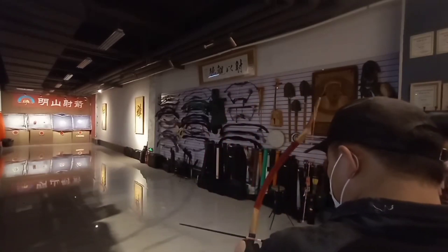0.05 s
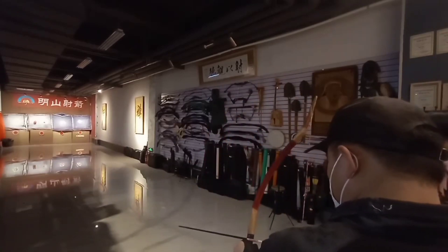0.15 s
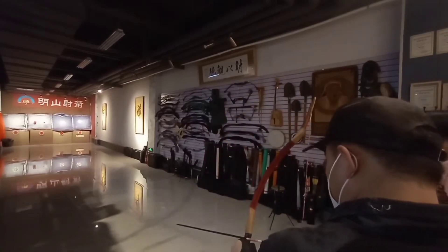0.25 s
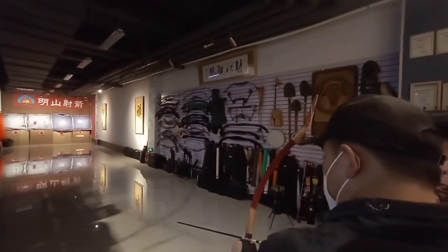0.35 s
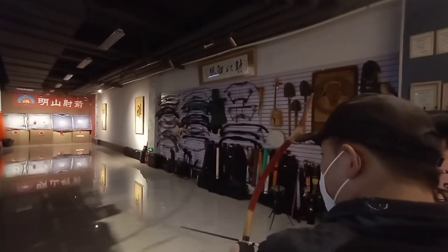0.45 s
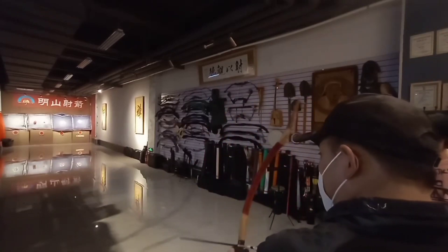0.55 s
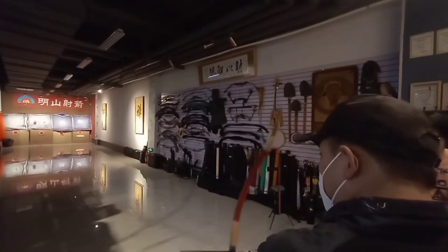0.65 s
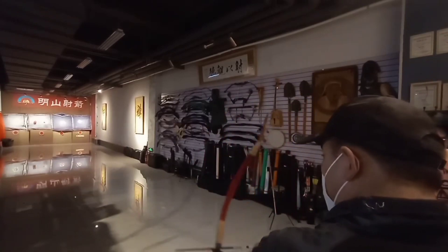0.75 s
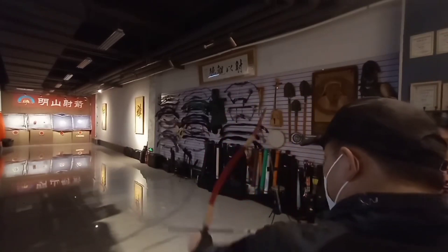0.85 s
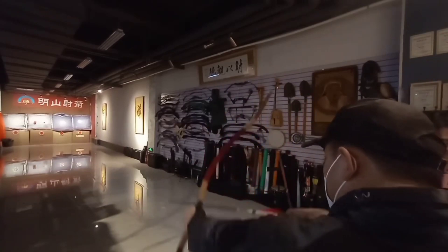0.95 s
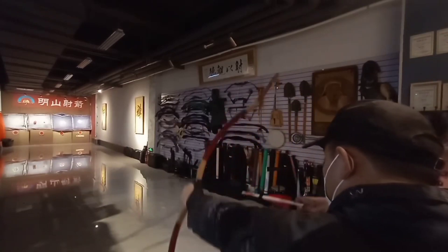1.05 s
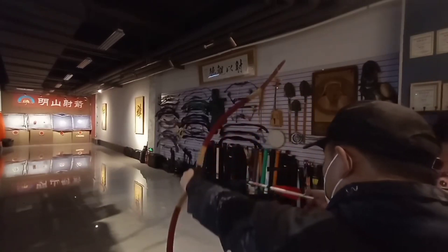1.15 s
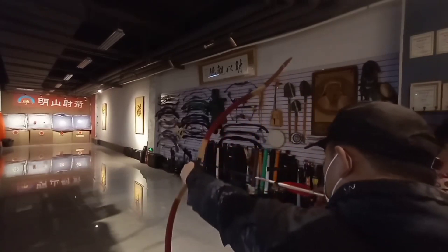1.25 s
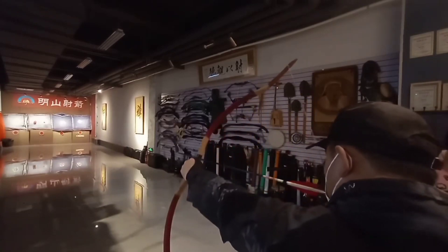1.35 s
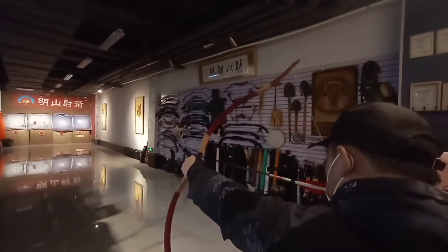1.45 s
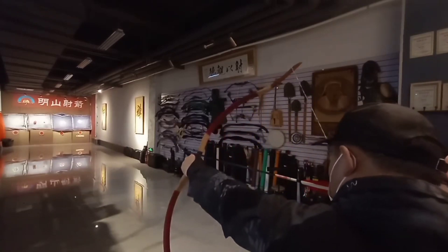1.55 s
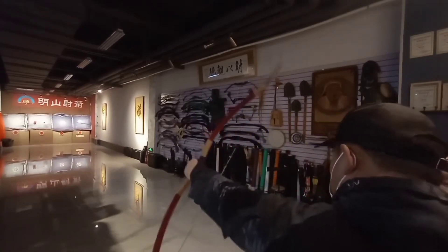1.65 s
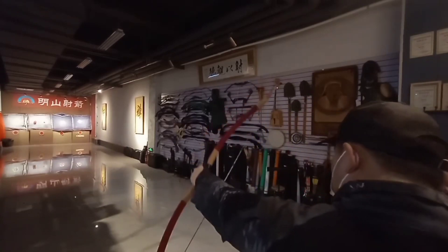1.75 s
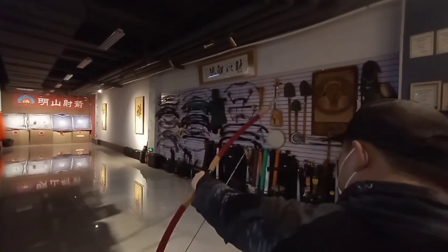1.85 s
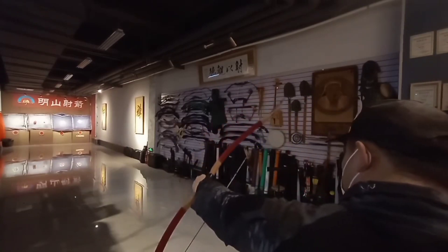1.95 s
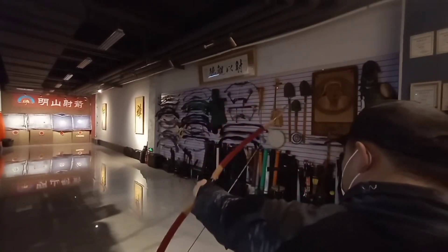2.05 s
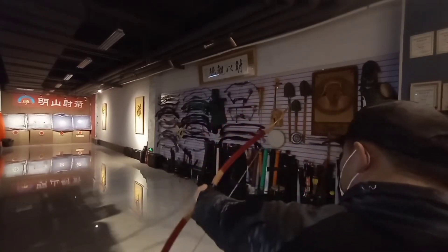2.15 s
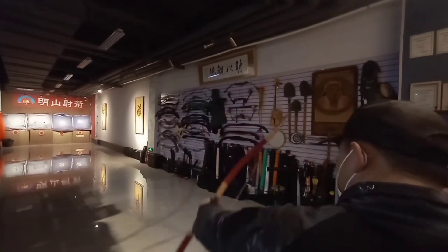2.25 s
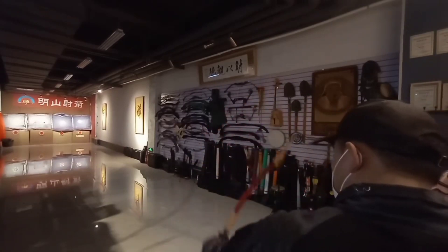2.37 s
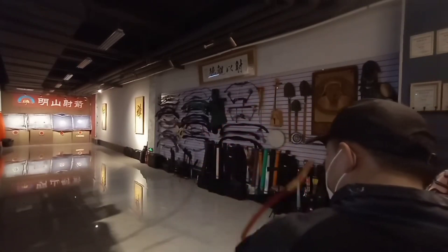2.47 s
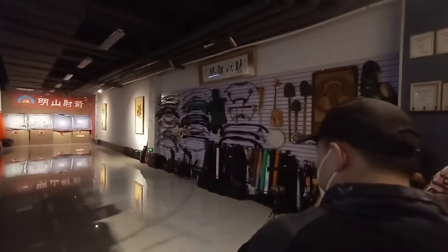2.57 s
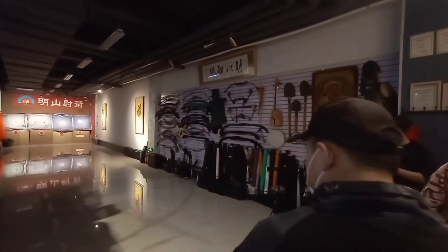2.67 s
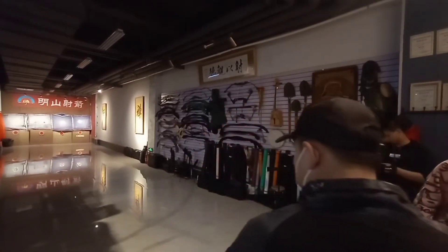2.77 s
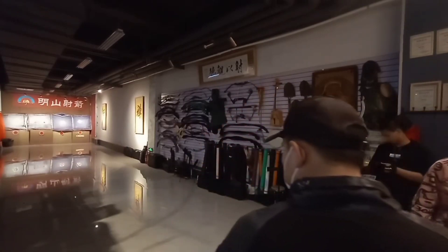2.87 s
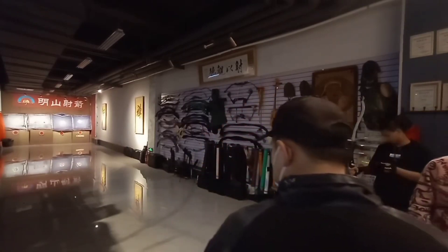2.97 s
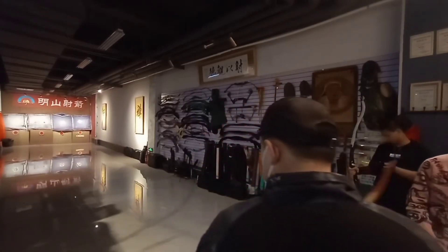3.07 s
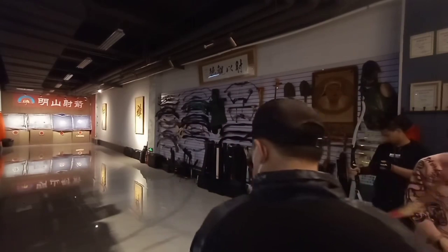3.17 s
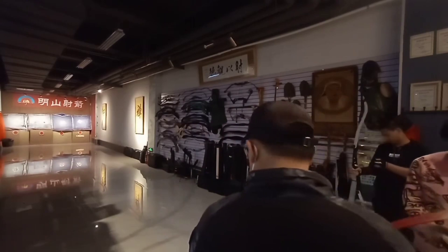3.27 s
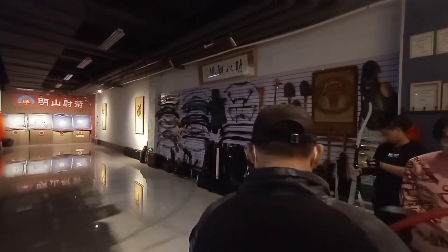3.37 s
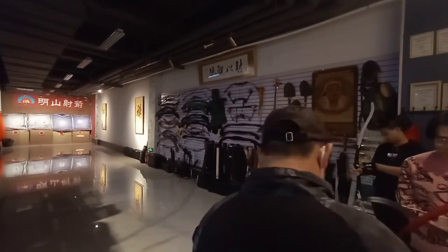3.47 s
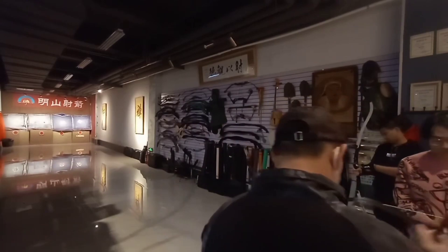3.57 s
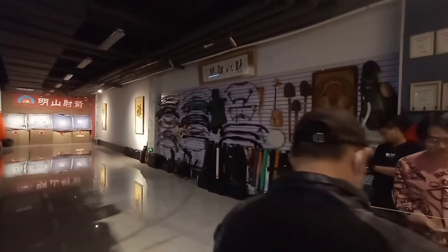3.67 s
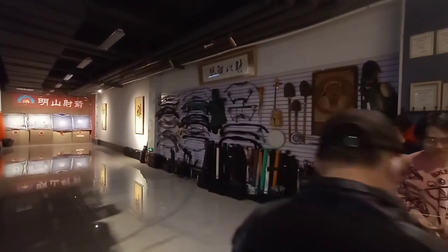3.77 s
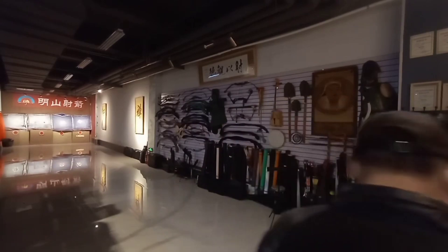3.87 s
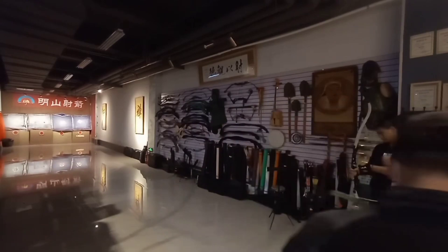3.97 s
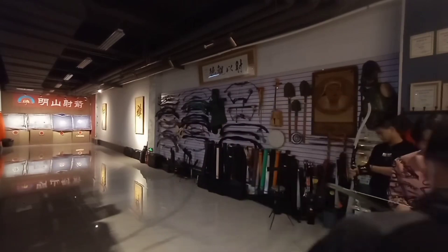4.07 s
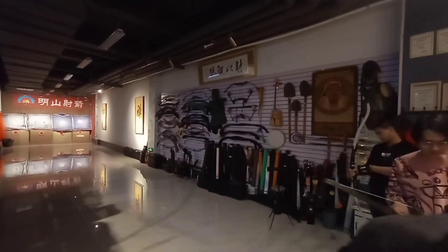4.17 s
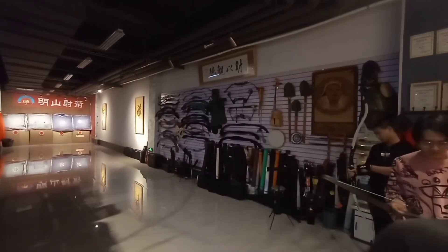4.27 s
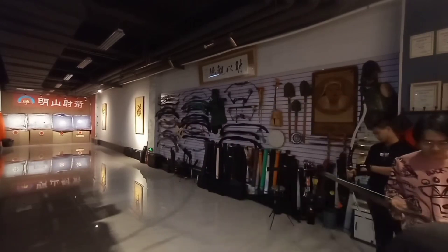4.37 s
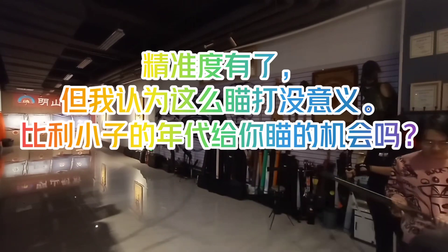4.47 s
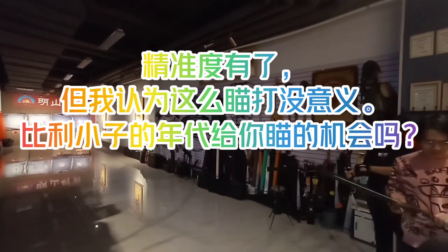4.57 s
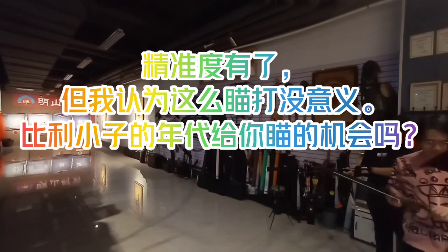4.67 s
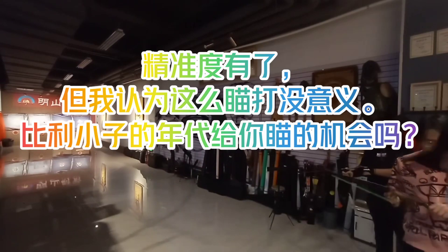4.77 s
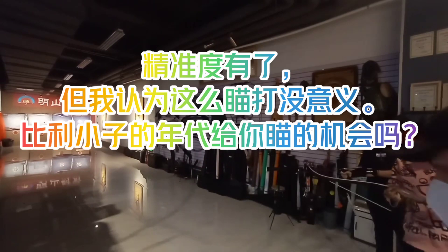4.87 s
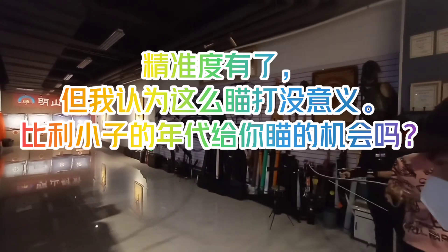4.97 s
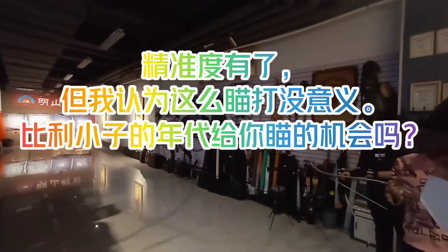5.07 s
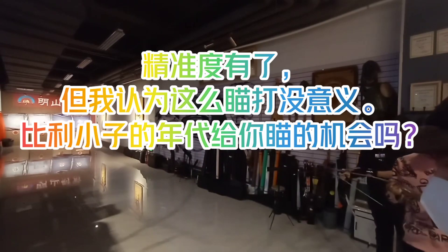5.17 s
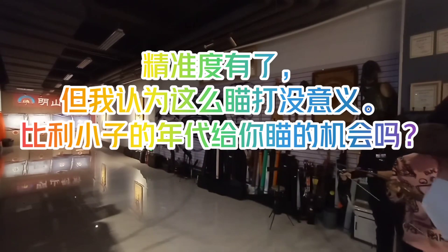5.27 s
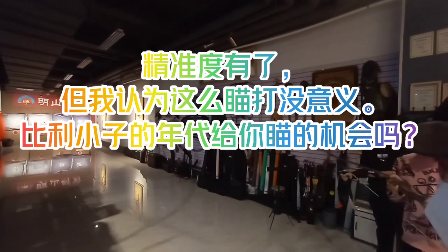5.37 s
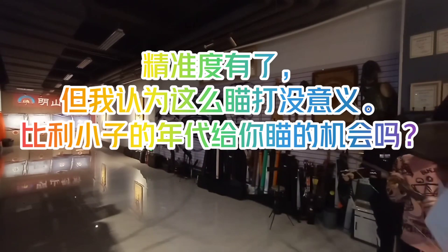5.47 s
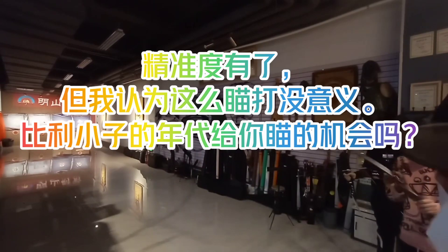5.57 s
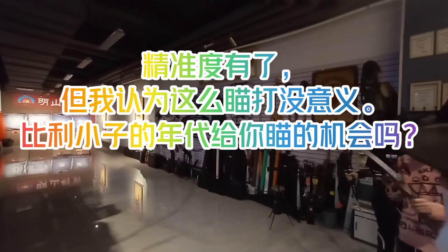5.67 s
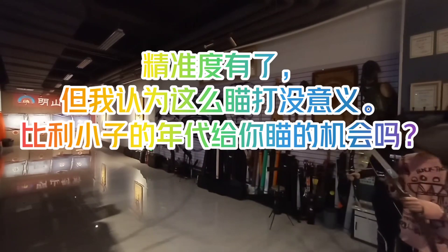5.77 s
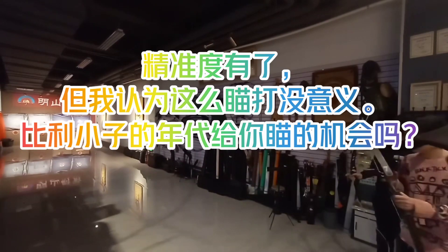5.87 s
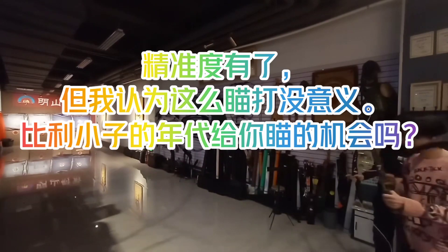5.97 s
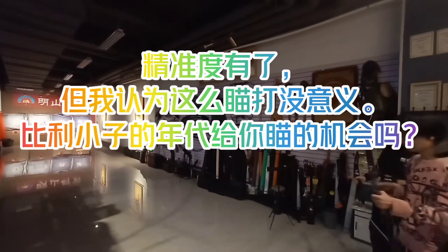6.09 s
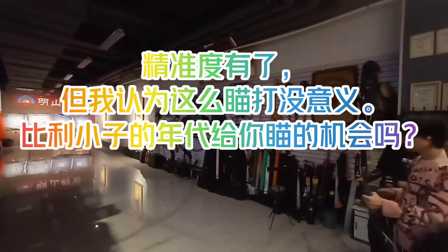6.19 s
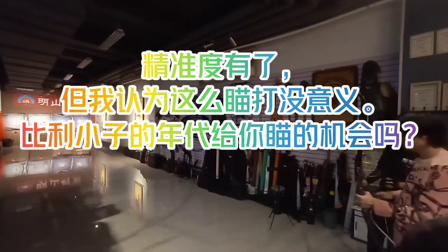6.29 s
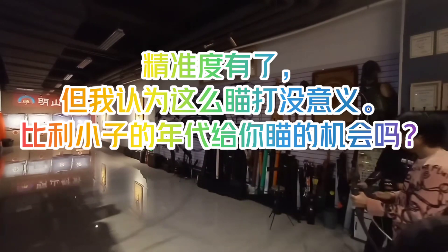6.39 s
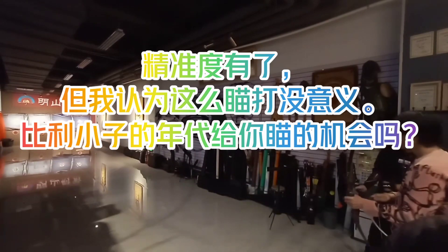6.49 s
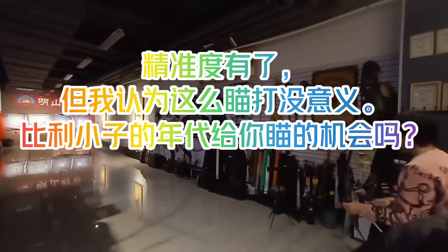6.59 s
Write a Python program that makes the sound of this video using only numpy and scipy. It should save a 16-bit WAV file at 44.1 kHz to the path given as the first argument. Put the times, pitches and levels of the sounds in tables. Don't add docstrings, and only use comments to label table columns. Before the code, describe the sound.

In a long hard-floored hall a bow snaps, its arrow booms into a distant bale, then shafts clack, fall and scrape close by.

```python
import sys
import numpy as np
from scipy import signal
from scipy.fft import rfft, irfft, next_fast_len
from scipy.io import wavfile
from scipy.ndimage import uniform_filter1d

SR = 44100
rng = np.random.default_rng(int(sys.argv[2]) if len(sys.argv) > 2 else 0)


def transcribe(u):
    v = np.clip(np.atleast_2d(u).T, -1, 1)
    q = np.round(v * 32767).astype(np.int16)
    wavfile.write(sys.argv[1], SR, q)


def natural_amplitude(level_db):
    exponent = np.asarray(level_db, float) / 20
    return 10 ** exponent


N = 292383

# [Hz, dB per Hz]
DROP_TONE = [(35, -53), (60, -28.5), (364, -7.5), (420, -4.5), (604, -9), (668, -10), (943, -2),
             (1600, -11), (3590, -14), (7600, -23), (9880, -55), (16700, -120)]
# [Hz, dB per Hz]
RUB_TONE = [(1000, -37.5), (1700, -9), (1960, -11.5), (2640, -6), (2970, -5.5), (4350, -2.5), (4660, -6),
            (6460, -3.5), (7600, -14.5), (9880, -27.5), (16700, -120)]


def evened(x):
    return x / np.sqrt(np.mean(x ** 2) + 1e-20)


def read(points, hz):
    f, value = np.transpose(points)
    return np.interp(np.log(hz + 1), np.log(f + 1), value)


def add(mix, s, sound):
    part = mix[round(s * SR):][:len(sound)]
    part += sound[:len(part)]


def coloured(x, tone, top_db=0.):
    points = tone[:-2] + [(9000, tone[-3][1] + top_db)]
    gain_db = read(points, abs(np.fft.fftfreq(4096, 1 / SR)))
    log_gain = np.log(natural_amplitude(np.maximum(gain_db, -100)))
    taps = np.fft.ifft(np.exp(np.conj(signal.hilbert(log_gain)))).real[:2048]
    return signal.oaconvolve(x, taps[None] / np.linalg.norm(taps), axes=1)[:, :x.shape[1]]


def resonate(x, hz, width_hz):
    return signal.lfilter(*signal.iirpeak(hz, hz / width_hz, SR), x)


def wander(per_s):
    lowpass = signal.butter(2, per_s, fs=SR, output="sos")
    return evened(signal.sosfilt(lowpass, rng.standard_normal(N)))


def walls(x, ms, share):
    taps = rng.standard_normal(3000) * np.exp(-np.arange(3000) / SR * 1000 / ms)
    taps *= share / np.linalg.norm(taps)
    taps[0] = 1
    return signal.oaconvolve(x, taps[None] / np.linalg.norm(taps), axes=1)[:, :x.shape[1]]


def hall(x, wet_db, size=1., bass=0.78, delay_ms=4.):
    # f/Hz, t60/s
    decay = [(120, 1), (330, 0.87), (870, 0.78), (2300, 0.55), (6000, 0.5), (7800, 0.42), (9000, 0.33),
             (12000, 0.38)]
    hz, t, z = signal.stft(x, SR, nperseg=256, noverlap=192)
    power = uniform_filter1d(abs(z) ** 2, size=15, axis=0)
    t60_s = size * read(decay, hz) * bass ** (1 / (1 + (hz / 900) ** 2))
    keep = natural_amplitude(-120 * t[1] / t60_s)
    stored = np.array([signal.lfilter([1 - k], [1, -k], p) for p, k in zip(power, keep)])
    a, b, c, d = rng.standard_normal(z.shape[::-1] + (4,)).T
    common, apart = a + 1j * b, c + 1j * d
    both = np.array([common + 0.38 * apart, common - 0.66 * apart])
    tail = signal.istft(both * np.sqrt(abs(stored)), SR, nperseg=256, noverlap=192)[1]
    tail = walls(tail, 10., .5)
    return x + natural_amplitude(wet_db) * np.roll(tail, round(delay_ms * SR / 1000), axis=1)[:, :len(x)]


def blow(rows, tone, top_db=0., **room):
    dry, out, ms = np.zeros(SR), np.zeros((2, N)), np.arange(3000) / SR * 1000
    for s, db, length_ms in rows:
        burst = rng.standard_normal(len(ms)) + 2 * (ms == 0)
        add(dry, s - rows[0][0], natural_amplitude(db) * burst * np.exp(-ms / length_ms))
    for port, sound in zip(out, coloured(hall(dry, **room), tone, top_db)):
        add(port, rows[0][0], sound)
    return out


def pressure(rows):
    t = np.arange(N) / SR
    return sum(natural_amplitude(db) * np.interp(t, [start, top, end], [0, 1, 0]) ** 1.48 for start, top, end, db in rows)


def air():
    # [Hz, dB per Hz]
    tone = [(15, -46.5), (25, -19), (178, -3.5), (237, -7.5), (679, -11.5), (783, -11), (1020, -13.5),
            (1150, -21), (1330, -11.5), (1900, -15.5), (3980, -22), (7600, -33), (9880, -71), (16700, -120)]
    level_db, alike, low_boost_db = -48, 0.97, 7
    frames, hz = N // 256 + 5, np.fft.rfftfreq(1024, 1 / SR)
    a, b, c, d, patches = rng.standard_normal((frames, 513, 5)).T
    patches = evened(uniform_filter1d(uniform_filter1d(patches, 8, 0), 12, 1))
    left = a + 1j * b
    z = np.array([left, alike * left + np.sqrt(1 - alike ** 2) * (c + 1j * d)])
    top_db = tone[-3][1]
    shelf = [(9500, top_db + 11), (11800, top_db + 11), (12200, top_db + 17), (15500, top_db + 21)]
    z *= natural_amplitude(read(tone[:-2] + shelf, hz)[:, None])
    z *= natural_amplitude(2.5 * patches + low_boost_db * (hz < 950)[:, None])
    return natural_amplitude(level_db) * evened(signal.istft(z, nperseg=1024, noverlap=768)[1][:, :N])


def fan():
    # f/Hz, width/Hz, level/dB
    modes = [(1180, 140, 1.5), (1353, 180, 3), (1562, 140, -3), (910, 130, -3.5)]
    level_db, waver_db, waver_per_s = -50.5, 2.4, 11.0
    ducts = np.zeros(N)
    for hz, width_hz, db in modes:
        noise = resonate(resonate(rng.standard_normal(N), hz, width_hz), hz, width_hz)
        ducts += natural_amplitude(db + waver_db * wander(waver_per_s)) * noise
    return natural_amplitude(level_db) * evened(ducts) * natural_amplitude(np.array([[-9.], [2.]]))


def bumps():
    # t/s, peak level/dB, f/Hz
    events = [(0.172, -43, 103), (1.137, -47, 177), (4.197, -50.5, 94.5), (4.582, -30, 111),
              (5.002, -44.5, 86), (5.463, -63, 166), (5.888, -43.5, 100), (6.002, -43, 162),
              (6.061, -50, 108)]
    out, t = np.zeros(N), np.arange(6000) / SR
    for s, db, hz in events:
        add(out, s, natural_amplitude(db + 15.5) * np.sin(2 * np.pi * hz * t) * (t / 0.011) * np.exp(-t / 0.0091))
    return out


def ticks():
    # t/s, peak level/dB, f/Hz
    nocks = [(0.0214, -31.5, 5330), (0.5744, -32.5, 3830), (0.7906, -23, 4370), (0.8386, -5, 4870),
             (0.8524, -21, 6760), (0.9872, -27, 6000), (1.0394, -38, 4240), (1.156, -15.5, 7100),
             (1.3393, -13.5, 4750), (5.2677, -22, 5650), (5.2902, -25, 3470), (5.6378, -19, 4030),
             (5.9794, -43, 4300)]
    # t/s, peak level/dB, f/Hz
    rattle = [(4.7382, -18, 3860), (4.791, -8.5, 2730), (4.8353, -16.5, 3500), (4.878, -15, 3380),
              (4.9372, -14, 3440), (4.9975, -17, 3600), (5.0798, -25, 4280), (5.158, -16, 3270)]
    # t/s, peak level/dB, f/Hz
    scuffs = [(0.167, -31, 2540), (0.5055, -33.5, 4800), (0.6097, -30, 4400), (0.700, -20.5, 6200),
              (0.75, -22.5, 5260), (0.9624, -14, 4970), (3.22, -29, 4100), (3.2694, -31, 3720),
              (4.537, -26.5, 3600), (6.0804, -29.5, 5580), (6.2094, -34.5, 2500)]
    # t/s, peak level/dB, f/Hz
    taps = [
        (3.919, -30.5, 3400),
        (4.0393, -38.5, 4200),
    ]
    # f/Hz, width/Hz, level/dB
    tap_ring = [(2560, 37, -11), (3400, 36, -7), (4060, 33, 10.5), (5050, 77, 6), (5820, 55, -3.5),
                (6700, 41, -4)]
    ring_db, ring_t60_ms = -20, 150
    out, near, ms = np.zeros(N), np.zeros(N), np.arange(4000) / SR * 1000
    # events, rise/ms, decay/ms, near level/dB
    kinds = [(nocks, 1.1, 2.41, -30), (rattle, 1.6, 3.6, 2.), (scuffs, 17.2, 16.5, -30), (taps, 1.1, 2.41, -30)]
    for rows, rise_ms, decay_ms, near_db in kinds:
        for s, db, hz in rows:
            scratch = rng.standard_normal(len(ms)) * (1 - np.exp(-ms / rise_ms)) * np.exp(-ms / decay_ms)
            tick = natural_amplitude(db - 7.5) * (scratch + 1.7 * resonate(scratch, hz, 340))
            add(out, s, tick)
            add(near, s, natural_amplitude(near_db) * tick)
    full = natural_amplitude(-2.0) * resonate(near, 1300, 1400)
    for s, db, _ in taps:
        for hz, _, mode_db in tap_ring:
            fading = natural_amplitude(db + ring_db + 0.347 * mode_db - ms * 60 / ring_t60_ms)
            add(near, s, fading * np.sin(2 * np.pi * hz * ms / 1000))
    return coloured(hall(out, wet_db=10.0, size=.5) + near, RUB_TONE, top_db=7.5) + full


def rubbing():
    # start/s, strongest/s, end/s, level/dB
    sleeve = [(0.45, 0.84, 1.38, -37.5), (0.88, 1.01, 1.21, -38.5), (1.2, 1.47, 1.6, -41.5),
              (3.15, 3.3, 4.5, -56), (4.5, 4.62, 4.54, -40)]
    # start/s, strongest/s, end/s, level/dB
    tumble = [(4.79, 4.84, 5.312, -34.5), (5.0, 5.15, 5.63, -44), (5.2, 5.37, 5.45, -45)]
    # start/s, strongest/s, end/s, level/dB
    slides = [(5.3, 5.55, 6.78, -42.5), (5.55, 5.8, 5.67, -40.5), (5.85, 6.03, 6.242, -47)]
    grains = rng.standard_normal(N) * natural_amplitude(1.5 * wander(7.) + 0.99 * rng.exponential(1, N))
    grains = grains + .4 * np.roll(grains, 700) * np.array([[1], [-1]])
    grains = walls(grains, 2.5, .55)
    hiss = evened(resonate(grains, 4250, 400))
    scratch = evened(coloured(grains, RUB_TONE, top_db=7.5))
    out = np.zeros((2, N))
    # strokes, body/Hz, body/dB, hiss/dB
    for rows, hz, body_db, hiss_db in [(sleeve, 1100, -5, -18), (tumble, 1020, 5, -3), (slides, 1300, -17, -4)]:
        body = evened(resonate(resonate(grains, hz, 1200), hz, 1200))
        out += pressure(rows) * (scratch + natural_amplitude(body_db) * body + natural_amplitude(hiss_db) * hiss)
    return out


def flick():
    # t/s, level/dB, length/ms
    contacts = [
        (1.291, -37, 1.8),
    ]
    return blow(contacts, DROP_TONE, wet_db=-6, size=.4)


def drop():
    # t/s, level/dB, length/ms
    contacts = [
        (4.633, -21.5, 2),
        (4.636, -2, 7.5),
        (4.641, -14, 1),
        (4.668, -28.5, 7.1),
        (4.678, -26, 4.2),
    ]
    return blow(contacts, DROP_TONE, top_db=-5.5, wet_db=3.5, size=1.1, bass=0.71)


def clack():
    # t/s, level/dB, length/ms
    contacts = [
        (2.96, -52, 20),
        (2.98, -42.5, 42),
        (3.003, 1, 0.63),
        (3.007, -13.5, 0.87),
        (3.013, -13.5, 2.4),
    ]
    # [Hz, dB per Hz]
    tone = [(120, -64), (200, -36.5), (357, -43), (1130, -12.5), (1260, -16), (1510, -6), (2280, -5),
            (2660, -4.5), (7600, -17), (9880, -47.5), (16700, -120)]
    # f/Hz, width/Hz, level/dB
    modes = [(1600, 110, -1), (2550, 220, -5), (3370, 73, -3), (4300, 120, 3.5), (6760, 360, 3)]
    knock = blow(contacts, tone, wet_db=2.5, size=.9)
    return knock + sum(natural_amplitude(db) * resonate(knock, hz, width_hz) for hz, width_hz, db in modes)


def shaft():
    # t/s, level/dB, length/ms
    contacts = [
        (2.3226, -11.5, 2.3),
        (2.325, 5.5, 1.4),
        (2.328, 0.5, 2.8),
    ]
    # [Hz, dB per Hz]
    tone = [(180, -46.5), (300, -23), (399, 1.5), (897, -24.5), (973, -6), (1070, -17.5), (1290, -4.5),
            (1810, -6), (3560, -6.5), (7600, -20), (9880, -56), (16700, -120)]
    # f/Hz, level/dB, t60/s
    modes = [(991, -12, 0.62), (1217, -14, 0.41), (1513, -1, 0.14), (2035, -9, 0.35), (2552, -11, 0.33),
             (3381, -13, 0.43), (3521, 0, 0.19), (3671, -13, 1.3), (4360, -16, 0.4), (4700, -11, 0.27),
             (5157, -34, 5.0), (5744, -17, 0.33), (6535, -17, 0.21), (7267, -23, 0.34)]
    # f/Hz, width/Hz, level/dB
    knock = [(2055, 84, -6.5), (3130, 67, -9.5), (3540, 90, 12.5), (4730, 99, -5.5), (6300, 180, -4.5)]
    t, out = np.arange(SR // 2) / SR, np.zeros(N)
    ring = np.zeros(len(t))
    for hz, db, t60_s in modes:
        wag = 1 + .6 * np.sin(2 * np.pi * (rng.uniform(8, 30) * t + rng.random()))
        ring += wag * natural_amplitude(db - 60 * t / min(t60_s, .55)) * np.sin(2 * np.pi * (hz * t + rng.random()))
    stopped = np.clip(t / .008, 0, 1) / (1 + np.exp((t - .25) / 0.0168))
    add(out, contacts[1][0], ring * natural_amplitude(-13.5) * stopped)
    hit = blow(contacts, tone, wet_db=0, size=.75)
    fading = natural_amplitude(-90 * np.maximum(np.arange(N) / SR - contacts[0][0], 0))
    rings = sum(natural_amplitude(db) * resonate(hit, hz, width_hz) for hz, width_hz, db in knock)
    return natural_amplitude(-5.0) * hit + fading * rings + out


def target():
    # t/s, level/dB, length/ms
    contacts = [
        (1.976, 5.2, 9.3),
        (1.981, 0, 1.7),
        (1.986, 0.037, 54),
    ]
    # [Hz, dB per Hz]
    tone = [(30, -38), (80, -17.5), (130, -7), (200, 0), (280, 2), (400, -3.5), (560, -8.5), (930, -13.5),
            (1250, -13.5), (2500, -18), (4100, -14.5), (7600, -27), (9880, -50), (16700, -120)]
    boom_hz, boom_ms, late, lost = 480, 45., .5, .25
    hit = blow(contacts, tone, wet_db=3.5, size=1.05, bass=0.79, delay_ms=5.5)
    ms = np.maximum(np.arange(N) / SR - contacts[0][0], 0) * 1000
    boom = signal.sosfiltfilt(signal.butter(2, boom_hz, fs=SR, output="sos"), hit)
    return hit - boom * (lost + late * np.exp(-ms / boom_ms)) * (ms > 0)


def string():
    # t/s, f/Hz, level/dB
    glide = [(1.507, 1102, -31.5), (1.513, 1684, -14.5), (1.519, 2255, -10.5), (1.522, 1600, 0),
             (1.528, 1500, -12.5), (1.534, 1500, -38.5)]
    s, hz, db = np.transpose(glide)
    t, out = np.arange(s[0], s[-1], 1 / SR), np.zeros(N)
    rough = 1 + 0.84 * uniform_filter1d(rng.standard_normal(len(t)), size=20)
    phase = 2 * np.pi * np.cumsum(np.interp(t, s, hz)) / SR
    add(out, s[0], rough * natural_amplitude(np.interp(t, s, db)) * np.sin(phase))
    return out


def bow():
    # t/s, level/dB, length/ms
    contacts = [(1.489, -32.5, 15), (1.496, -24.5, 14), (1.501, -13.5, 6.9), (1.5035, -8.5, 2.6),
                (1.506, -5.5, 2.8), (1.513, -11.5, 4), (1.5205, 4.5, 2.1), (1.5255, -3, 1.1),
                (1.528, -1, 1), (1.5315, -5.5, 0.89), (1.539, 9.5, .25)]
    # [Hz, dB per Hz]
    tone = [(24, -58.5), (40, -30), (76, -20.5), (153, -19.5), (367, -7), (664, -17.5), (1370, -9),
            (2590, -16.5), (3680, -11.5), (7600, -21), (9880, -45.5), (16700, -120)]
    return blow(contacts, tone, wet_db=6.0, size=1.05, bass=0.58, delay_ms=9.7)


def scene():
    room = air() + fan() + bumps()
    handling = ticks() + rubbing() + flick() + drop()
    return room + handling + clack() + shaft() + target() + string() + bow()


def narrowed(x):
    gate_hz, gate_over_db, gate_db = 950, 11, 7
    loud_db, mottle_db = -68.0, 3.5
    hz, t, z = signal.stft([x.mean(0), (x[0] - x[1]) / 2], SR, nperseg=1024, noverlap=768)
    f = hz[:, None]
    power = abs(z[0]) ** 2
    level_db = 10 * np.log10(uniform_filter1d(uniform_filter1d(power, size=30, axis=0), size=3, axis=1) + 1e-14)
    low_db = 10 * np.log10(uniform_filter1d(uniform_filter1d(power, size=7, axis=0), size=9, axis=1) + 1e-14)
    shut = (low_db < np.median(low_db, axis=1)[:, None] + gate_over_db) & (f < gate_hz)
    z = z / natural_amplitude(gate_db * uniform_filter1d(shut * 1., size=3, axis=1))
    level_db = level_db - gate_db * (f < gate_hz)
    whole_db = 10 * np.log10(power.sum(0) + 1e-14)
    bands = rng.standard_normal((len(t) // 5 + 1, 103, 2)).T
    patches, flicker = np.repeat(np.repeat(bands, 5, axis=1), 5, axis=2)[:, :len(hz), :len(t)]
    steady = np.abs(np.gradient(whole_db)) < 1.6
    treble = np.clip(f / 2000 - 1, 0, 1)
    holes = flicker < -2.1 + 1.5 * np.exp(-((f - 8700) / 1500) ** 2)
    mottle = natural_amplitude(mottle_db * (0.7658 + 0.18 * treble) * flicker) * ~(holes & (treble > .5))
    mid = z[0] * np.where(steady, mottle, 1)
    mid *= ~((f > 11900) & steady & (whole_db > -42))
    kept = level_db + 3 * patches < loud_db + 18 * np.exp(-((f - 1200) / 900) ** 2)
    kept &= whole_db < -31
    kept &= patches < 2.5 - 2.6 * treble - 1.1 * (abs(f - 10200) < 1900)
    band = (hz > 6300) & (hz < 7300)
    jumped = np.gradient(10 * np.log10(power[band].sum(0) + 1e-14)) > 3.5
    fresh = uniform_filter1d(jumped * 1., size=11, origin=5) > 0
    wide = band[:, None] & fresh & (patches[band].mean(0) > .25)
    kept |= (f > 6300) & ~steady & (whole_db > -12)
    side = z[1] * np.where(wide, 1.8, kept)
    mid, side = signal.istft([mid, side], SR, nperseg=1024, noverlap=768)[1][:, :N]
    return np.array([mid + side, mid - side])


def band_limit(x):
    return signal.sosfilt(signal.butter(12, 15660, fs=SR, output="sos"), x)


def record(dry):
    # f/Hz, gain/dB
    mic = [(7400, 0), (8000, -5.5), (9200, -20.5), (11700, -20.5), (12100, -45), (16000, -36)]
    size = next_fast_len(N)
    response = natural_amplitude(read(mic, np.fft.rfftfreq(size, 1 / SR)))
    heard = irfft(rfft(dry, size) * response, size)[:, :N]
    power_db = 10 * np.log10(signal.lfilter([.004], [1, -.996], (heard ** 2).mean(0)) + 1e-12)
    fall_db = np.arange(N) * 26.0 / SR
    over_db = np.maximum(np.maximum.accumulate(power_db + fall_db) - fall_db + 13.5, 0)
    ducked = np.clip(heard / natural_amplitude(.5 * over_db), -.97, .97)
    ducked = signal.lfilter(*signal.butter(1, 40, "high", fs=SR), ducked)
    return band_limit(narrowed(ducked))


dry = scene()
out = record(dry)
transcribe(out)
```